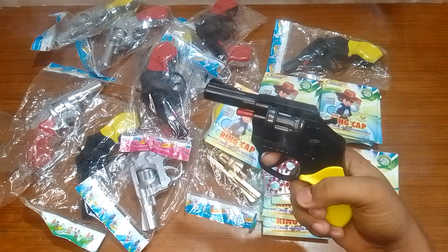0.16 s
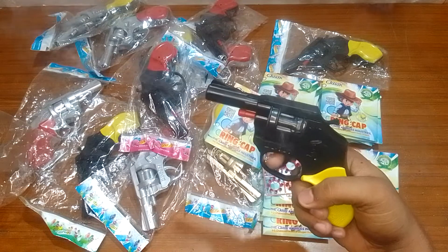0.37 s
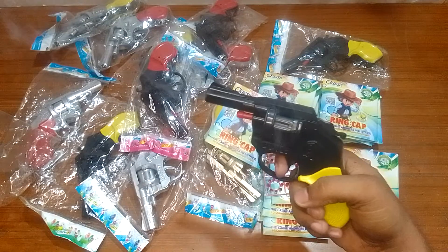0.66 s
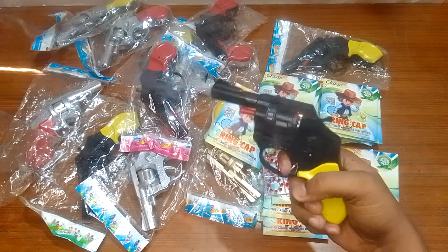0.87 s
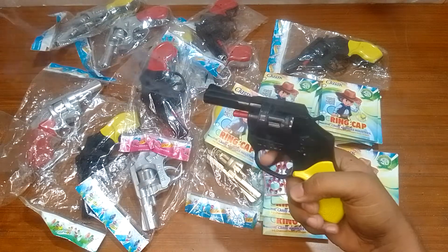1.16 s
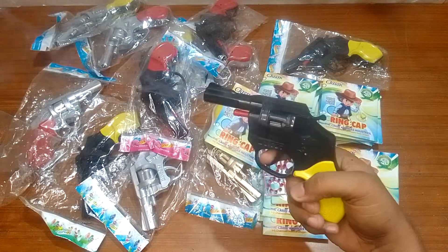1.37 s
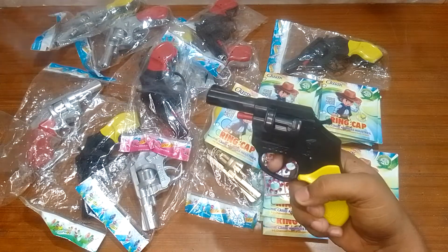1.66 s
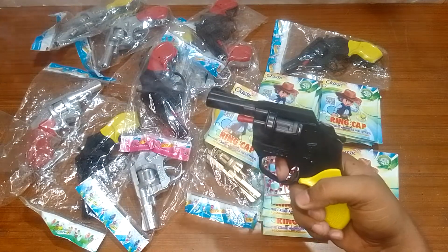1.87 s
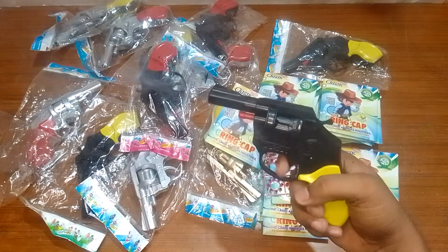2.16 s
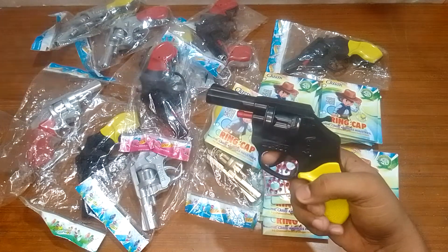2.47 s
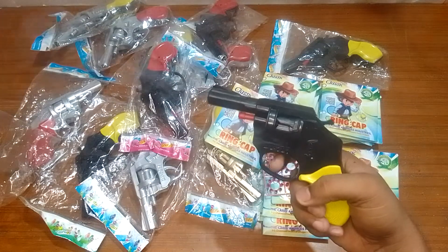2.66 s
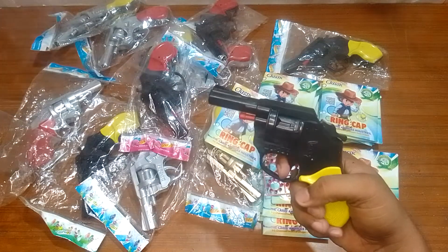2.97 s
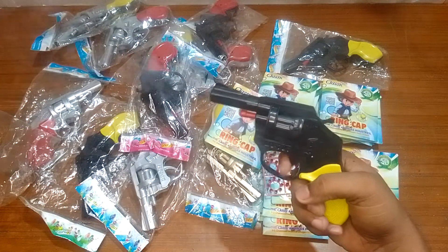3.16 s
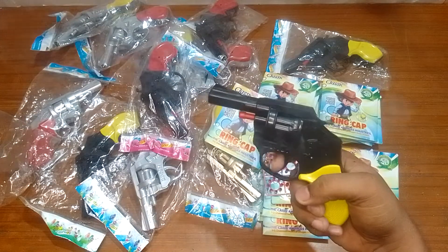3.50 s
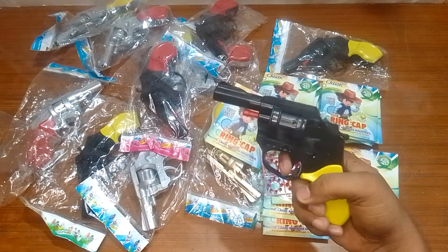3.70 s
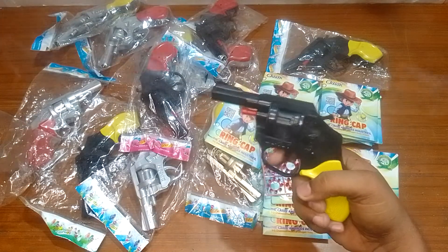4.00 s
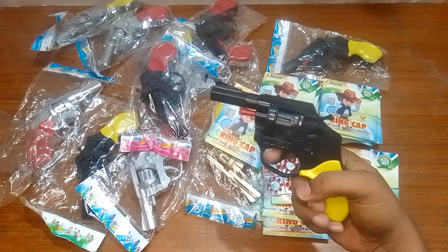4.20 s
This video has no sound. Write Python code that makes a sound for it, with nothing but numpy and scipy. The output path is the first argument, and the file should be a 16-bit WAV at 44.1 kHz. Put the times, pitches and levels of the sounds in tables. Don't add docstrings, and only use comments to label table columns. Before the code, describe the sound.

A toy cap revolver fires four sharp, ringing bangs in a bare hard room, with plastic trigger snaps and tiny cylinder ticks between them.

```python
import sys
import numpy as np
from scipy import signal
from scipy.fft import rfft, irfft
from scipy.io import wavfile
from scipy.ndimage import uniform_filter1d

SR = 44100
rng = np.random.default_rng(int(sys.argv[2]) if len(sys.argv) > 2 else 0)


def to_linear_factor(level_db):
    exponent = np.asarray(level_db, float) / 20
    return 10 ** exponent


def master(y):
    cut = np.clip(np.atleast_2d(y).T, -1, 1)
    pcm = np.round(cut * 32767)
    wavfile.write(sys.argv[1], SR, pcm.astype(np.int16))


N = 191526

SHOTS = [
    -.11,
    .9679,
    2.1163,
    3.1477,
    3.8848,
]
# echo_db, ducking_db, recovery_s, body_below_2khz_db, rumble_below_400hz_db
CAPS = [
    (-10, -6, 0.045, -5.5, 0.5),
    (-16, 7, 0.054, -4.5, 1),
    (-8.5, 20, 0.087, -1.5, 3.5),
    (-23, 7, 0.052, -16, -12),
    (-14.5, 16.5, 0.04, -8, 6.5),
]
# pitch_hz, level_db (per Hz)
BANG_SPECTRUM = [(40, -10), (70, -2.5), (150, -5.5), (300, -2), (700, 0), (1300, 3.5), (1900, -3.5),
                 (2700, -6), (3300, -8.5), (4300, -14), (8500, -14.5), (9900, -27), (16000, -19)]
# pitch_hz, t60_s
ROOM_T60 = [(60, 0.81), (300, 0.37), (700, 0.34), (1400, 0.53), (2600, 0.51), (4200, 0.55), (8000, 0.54),
            (10000, 0.59), (16000, 0.26)]
# from_hz, to_hz, level_db, t60_s
HOLLOW_BODY = (3050, 3600, -1, 0.6)
# pitch_hz, level_db (per Hz)
SNAP_ECHO = [(300, -46), (900, -9.5), (2000, -13), (2600, -3.5), (3300, -4.5), (4200, -10.5), (8500, -14),
             (10000, -36.5), (16000, -23)]
# pitch_hz, level_db (per Hz)
PAWL_ECHO = [(300, -45), (1200, -47), (2100, -20), (2650, -2), (3100, -10.5), (4200, -12), (8500, -15),
             (10000, -52), (16000, -42)]
# start_s, push_db, fall_s, suction_db (after the push), suction_s
PUFFS = [
    (.9685, -14.5, .002, .5, .0095),
    (2.118, -9.5, .0042, -8, .007),
    (2.138, -21, .003, 6, .011),
    (3.148, -32, .002, 5, .009),
    (3.886, -21, .008, -2, .015),
]
# start_s, peak_db
SEAR = [
    (0.9443, -29.5),
    (0.9653, -35),
    (2.0951, -31),
    (2.1118, -42.5),
    (3.1376, -30),
    (3.144, -38.5),
    (3.8607, -39.5),
    (3.8819, -33),
]
# start_s, peak_db
TRIGGER_RETURN = [(0.1351, -15), (1.2119, -17), (2.3719, -15), (3.363, -14.5), (4.1177, -15.5)]
# start_s, peak_db, main_ring_hz
TICKS = [(0.667, -66, 2820), (0.6732, -53, 2570), (1.868, -67, 2900), (1.8866, -60.5, 2650),
         (2.699, -62.5, 2660), (2.7437, -60.5, 2760), (2.835, -60, 2630), (2.8378, -50.5, 2590),
         (3.3075, -28, 2940), (3.539, -52, 2690), (3.567, -53, 2610), (3.5803, -56, 2800),
         (3.6403, -41.5, 2695), (3.645, -35.5, 2610), (4.3344, -51, 2650)]
HAMMER_DB = [-18, -22, -17, -29]
# pitch_hz, level_db, t60_s
SEAR_MODES = [(2980, 0, .04), (3170, -12, .09), (4484, -11, .016), (4850, -14, .014), (6340, -19, .02),
              (8000, -21, .02)]
# pitch_hz, level_db, t60_s
TRIGGER_MODES = [(1200, -13, .025), (2550, -2, .013), (2950, -3, .012), (3424, -5, .018), (4000, -6, .008),
                 (4800, -7, .008), (7000, -6, .008), (8000, -7, .008)]
# multiple_of_main_ring, level_db, t60_s
TICK_MODES = [(1, 0, .028), (1.012, -16, .18), (.985, -19, .16), (1.14, -8, .025), (1.63, -14, .01),
              (1.85, -16, .01), (2.3, -17, .01), (3.1, -19, .008)]
# pitch_hz, level_db, t60_s
FRAME_MODES = [(390, -5, .03), (600, -9, .02), (850, -6, .016), (1160, 3, .035), (1350, -1, .018),
               (1750, -4, .012)]
# start_s, opening_db, closing_db_per_s, late_room_murmur_db
OPENERS = [
    (-.11, -1, 17, -28),
    (.668, -10, 1.5, -99),
    (.968, -0.5, 13.5, -40),
    (2.115, 3, 34, -22.5),
    (2.83, -13.5, -8, -99),
    (3.147, -1, 22, -41.5),
    (3.886, -3.5, 9.5, -37.5),
]
# pitch_hz, level_db (per Hz)
HUM = [(20, -6.5), (32, -19), (48, -14), (64, -3), (78, -7), (95, -13), (114, -10), (138, 1), (160, -10.5),
       (185, -5.5), (215, -28.5), (460, -120)]
# pitch_hz, level_db (per Hz)
DRONE = [(60, -110), (170, -26), (210, 0.5), (240, -4), (300, -4.5), (380, -27.5), (900, -110)]
# pitch_hz, level_db (per Hz)
AIR = [(250, -14.5), (340, -11.5), (500, -11.5), (620, -11.5), (1000, -15), (1250, -10), (1700, -19),
       (2200, -23), (3400, -29.5), (4200, -39), (9000, -51), (16000, -63.5)]
# start_s, end_s, pitch_hz, level_db
FAINT_CREAKS = [
    (1.33, 1.43, 575, -70),
    (2.88, 3.05, 620, -79),
    (3.08, 3.15, 3200, -80),
    (4.2, 4.3, 740, -72),
]

RUMBLE_S, RUMBLE_PER_RECOVERY = 0.053, 0.12
ROOM_RIPPLE_DB, RIPPLE_BINS = 2, 160
ECHO_STEP = 16
GATE_LAG_S, GATE_SHUT_DB = .03, -19.5
HUM_DB, AIR_DB, DRONE_DB = -56, -72, -67.5
DRONE_FOLLOWS, AIR_FOLLOWS = 0.97, 0.89
AIR_SHUT_DB, DRONE_SHUT_DB = -81, -86
TICK_AIR_DB, TICK_DRONE_DB = 6.5, 2
DRONE_HOLD_S, DRONE_FALL_DB_PER_S = 0.46, 56
MURMUR_DELAY_S, MURMUR_RISE_DB_PER_S, MURMUR_FALL_DB_PER_S = 0.11, 398, 114.5


def at_hz(points, hz):
    table = np.array(points)
    return np.interp(np.log(hz), np.log(table[:, 0]), table[:, 1])


def rms_one(x):
    return x / np.sqrt(np.mean(x ** 2) + 1e-20)


def coloured(spectrum):
    hz = np.maximum(np.arange(N // 2 + 1) * SR / N, 1)
    return rms_one(irfft(rfft(rng.standard_normal(N)) * to_linear_factor(at_hz(spectrum, hz)), N))


def bang_power(t, hz, fall):
    power = np.zeros(len(t))
    for s, (echo_db, duck_db, recovery, body_db, rumble_db) in zip(SHOTS, CAPS):
        age = np.maximum(t - s, 0)
        rumble_s = RUMBLE_S + RUMBLE_PER_RECOVERY * recovery
        rumble = rumble_db - 250 * np.maximum(age - rumble_s, 0)
        colour = at_hz(BANG_SPECTRUM, hz) + body_db / (1 + (hz / 2000) ** 4) + rumble / (1 + (hz / 400) ** 4)
        held = duck_db * (1 - 0.16 / (1 + (3500 / hz) ** 4))
        ducked = held * np.clip(1 - age / recovery, 0, 1)
        decay = fall * age * (1.2426 + 0.35 * age)
        power += (t >= s) * to_linear_factor(2 * (echo_db + 13.5 + colour - ducked - decay))
    return power


def click_power(t, hz, fall, clicks):
    power = np.zeros(len(t))
    for s, echo_db, colour in clicks:
        age = np.maximum(t - s, 0)
        build = np.minimum(age / 0.0015, 1)
        power += build * to_linear_factor(2 * (echo_db + 8.5 + at_hz(colour, hz) - 1.438 * fall * age))
    return power


def echoes():
    out, t = np.zeros(N), np.arange(0, N + ECHO_STEP, ECHO_STEP) / SR
    edges = 40 * 2 ** np.arange(0, 8.9, 1 / 5)
    ripple_db = ROOM_RIPPLE_DB * rms_one(uniform_filter1d(rng.standard_normal(N // 2 + 1), size=RIPPLE_BINS))
    white = rms_one(irfft(rfft(rng.standard_normal((2, N))) * to_linear_factor(ripple_db), N))
    clicks = [(s, db - 20, SNAP_ECHO) for s, db in TRIGGER_RETURN]
    clicks += [(s, db - 19, SNAP_ECHO) for s, db in SEAR]
    clicks += [(s, db - 18.5, PAWL_ECHO) for s, db, hz in TICKS]
    uneven = to_linear_factor(1.2 * rms_one(uniform_filter1d(rng.standard_normal(len(t)), size=24)))
    bands = [(low, high, 0, at_hz(ROOM_T60, low)) for low, high in zip(edges, edges[1:])]
    for k, (low, high, extra_db, t60) in enumerate(bands + [HOLLOW_BODY]):
        hz, fall = np.sqrt(low * high), 60 / t60
        power = bang_power(t, hz, fall) + click_power(t, hz, fall, clicks)
        band_filter = signal.butter(2, [low, high], "band", fs=SR, output="sos")
        band = signal.sosfilt(band_filter, white[k % 2])
        envelope = np.repeat(uneven * np.sqrt(power), ECHO_STEP)[:N]
        out += to_linear_factor(extra_db) * envelope * band
    return out


def puffs():
    out, t = np.zeros(N), np.arange(N) / SR
    for s, push_db, fall, suction_db, lasts in PUFFS:
        rise = np.exp(-(np.minimum(t - s, 0) / .0019) ** 2)
        push = rise * np.cos(np.pi / 2 * np.clip((t - s) / fall, 0, 1))
        suction = to_linear_factor(suction_db) * np.sin(np.pi * np.clip((t - s - fall) / lasts, 0, 1) ** .8)
        out += to_linear_factor(push_db) * (push - suction)
    return out


def strikes(events, modes, crack_db, spread_db, contact):
    out, age = np.zeros(N), np.arange(SR // 8) / SR
    burst_len = SR // 100
    chance = rng.standard_normal((len(events), 2, len(modes)))
    chatter = rng.standard_normal((len(events), burst_len)) * np.exp(-age[:burst_len] / contact)
    chatter[:, 0] = np.sqrt(contact * SR)
    thin = signal.butter(1, [2100, 8000], "band", fs=SR, output="sos")
    crack = to_linear_factor(crack_db) * signal.sosfilt(thin, np.arange(burst_len) == 0)
    for (s, peak_db, *ring_hz), (loud, tune), burst in zip(events, chance, chatter):
        rings = np.zeros(len(age))
        for (hz, db, t60), k, d in zip(modes, loud, tune):
            mode_hz = hz * np.prod(ring_hz) * (1 + .012 * d)
            rings += to_linear_factor(db + spread_db * k - 60 * age / t60) * np.sin(2 * np.pi * mode_hz * age)
        rings[:burst_len] += crack
        hit = signal.fftconvolve(rings, burst)[:len(age)]
        i = round(s * SR)
        out[i:i + len(age)] += (to_linear_factor(peak_db) * hit / np.abs(hit).max())[:N - i]
    return out


def mechanism():
    sear = strikes(SEAR, SEAR_MODES, crack_db=-6, spread_db=1.2, contact=.0005)
    trigger = strikes(TRIGGER_RETURN, TRIGGER_MODES, crack_db=13, spread_db=1.5, contact=.0016)
    pawl = strikes(TICKS, TICK_MODES, crack_db=12, spread_db=2, contact=.0007)
    knocks = list(zip(SHOTS[1:], HAMMER_DB))
    hammer = strikes(knocks, FRAME_MODES, crack_db=-2, spread_db=1, contact=.00015)
    small = signal.sosfilt(signal.butter(4, 2350, "high", fs=SR, output="sos"), sear + pawl)
    trigger = signal.sosfilt(signal.butter(4, 850, "high", fs=SR, output="sos"), trigger)
    return small + trigger + hammer


def gate(t):
    columns = np.transpose(OPENERS)
    latest = np.searchsorted(columns[0], t) - 1
    s, open_db, closing, murmur_db = columns[:, latest]
    age = t - s
    opening = np.maximum(open_db - closing * age, GATE_SHUT_DB)
    opening = uniform_filter1d(opening, size=max(int(GATE_LAG_S * SR), 1))
    not_yet = MURMUR_RISE_DB_PER_S * np.maximum(MURMUR_DELAY_S - age, 0)
    murmur = murmur_db - MURMUR_FALL_DB_PER_S * age - not_yet
    ticked = murmur_db < -90
    return age, opening, murmur, ticked


def creaks(t):
    out = np.zeros(N)
    for start, end, hz, creak_db in FAINT_CREAKS:
        swell = np.sin(np.pi * np.clip((t - start) / (end - start), 0, 1)) ** .5
        peak = [(hz / 2, -110), (hz - 50, -30), (hz, 0), (hz + 50, -30), (hz * 2, -110)]
        out += to_linear_factor(creak_db) * swell * coloured(peak)
    return out


def background():
    t = np.arange(N) / SR
    age, opening, murmur, ticked = gate(t)
    air_db = AIR_DB + AIR_FOLLOWS * opening + TICK_AIR_DB * ticked
    air = to_linear_factor(np.maximum(air_db, AIR_SHUT_DB)) + to_linear_factor(murmur)
    held = DRONE_DB + DRONE_FOLLOWS * opening - DRONE_FALL_DB_PER_S * np.maximum(age - DRONE_HOLD_S, 0)
    drone = to_linear_factor(np.where(ticked, DRONE_SHUT_DB + TICK_DRONE_DB, np.maximum(held, DRONE_SHUT_DB)))
    steady = to_linear_factor(HUM_DB + opening) * coloured(HUM) + drone * coloured(DRONE) + air * coloured(AIR)
    return steady + creaks(t)


def scene():
    return np.tile(echoes() + puffs() + mechanism() + background(), (2, 1))


def top_cut(x):
    return signal.sosfilt(signal.butter(12, 16480, fs=SR, output="sos"), x)


def record(dry):
    rounded = 0.63 * np.tanh(dry / 0.6)
    low_pass = signal.cheby2(16, 70, 16300, fs=SR, output="sos")
    mix = signal.sosfilt(low_pass, rounded) + .0026
    return top_cut(mix)


dry = scene()
out = record(dry)
master(out)
```